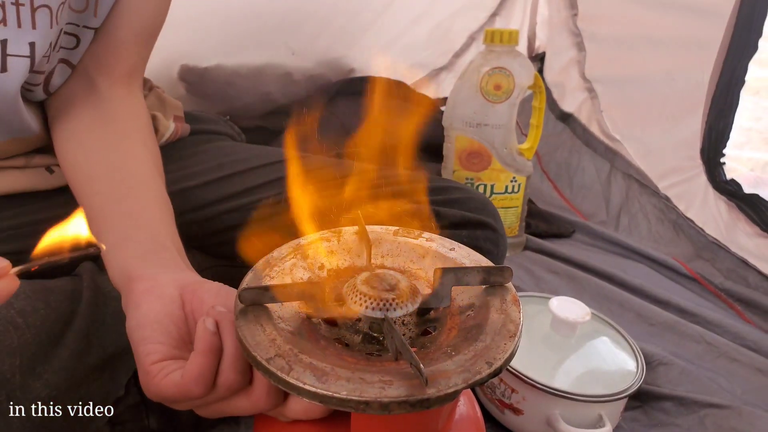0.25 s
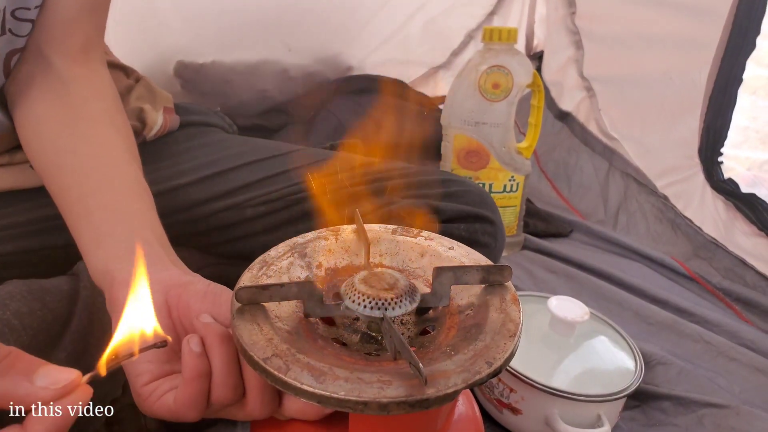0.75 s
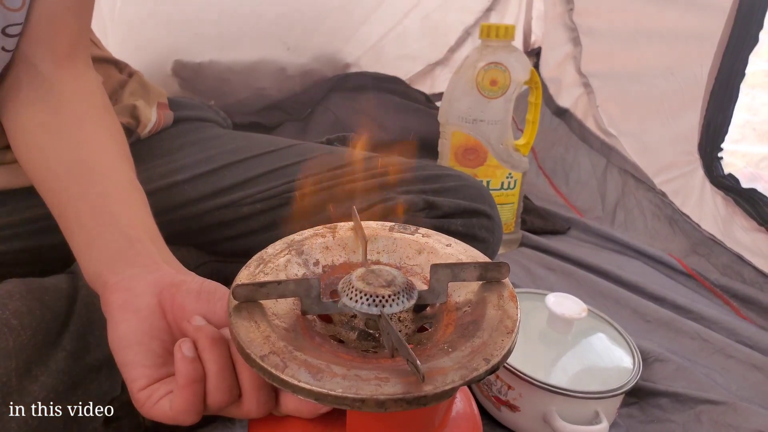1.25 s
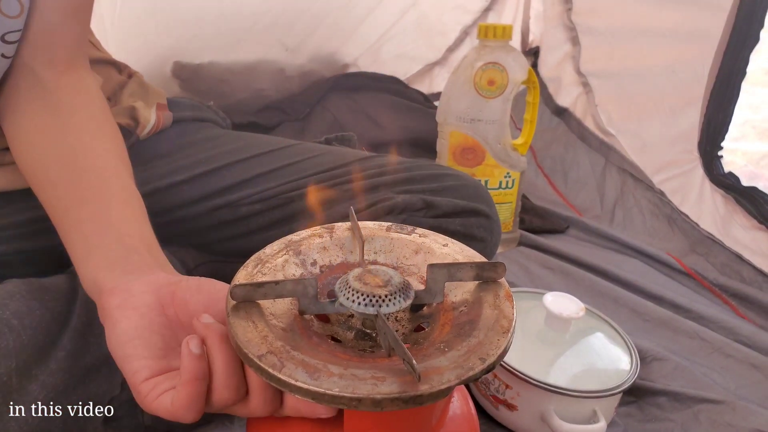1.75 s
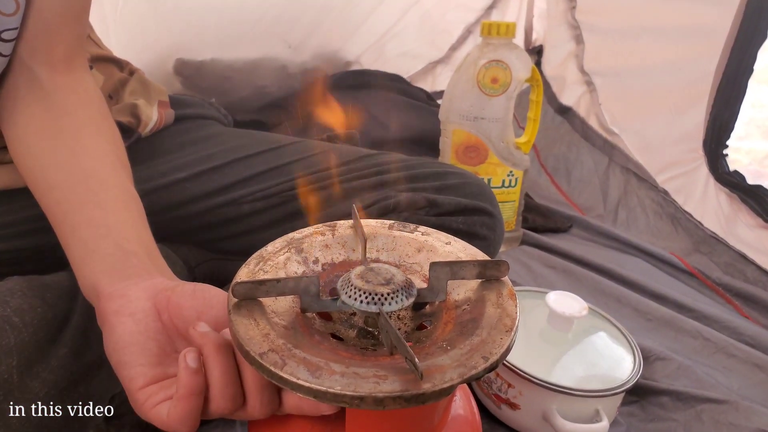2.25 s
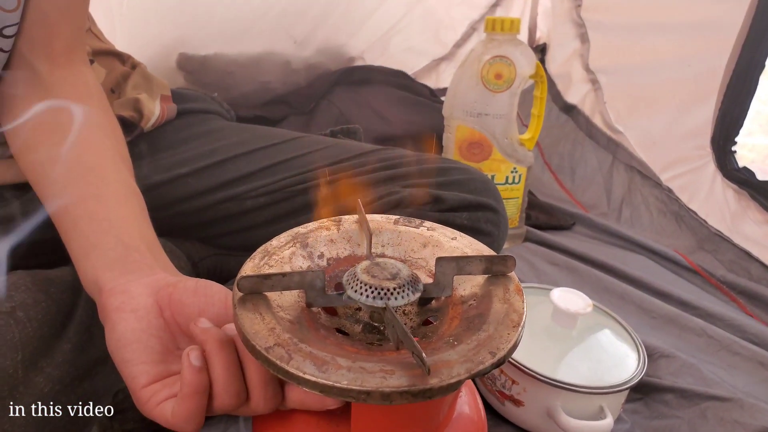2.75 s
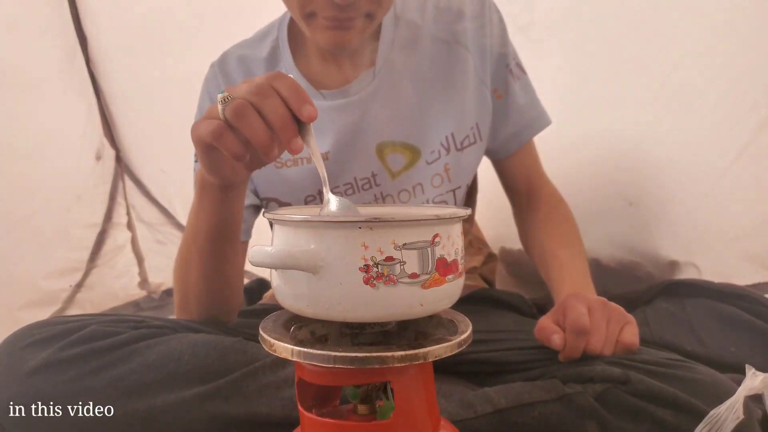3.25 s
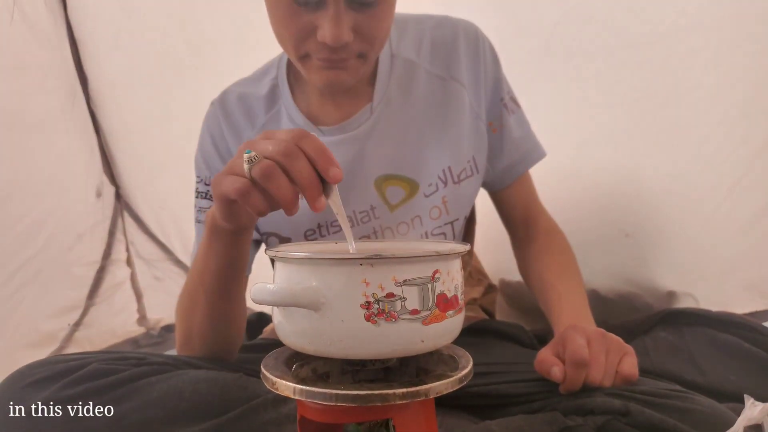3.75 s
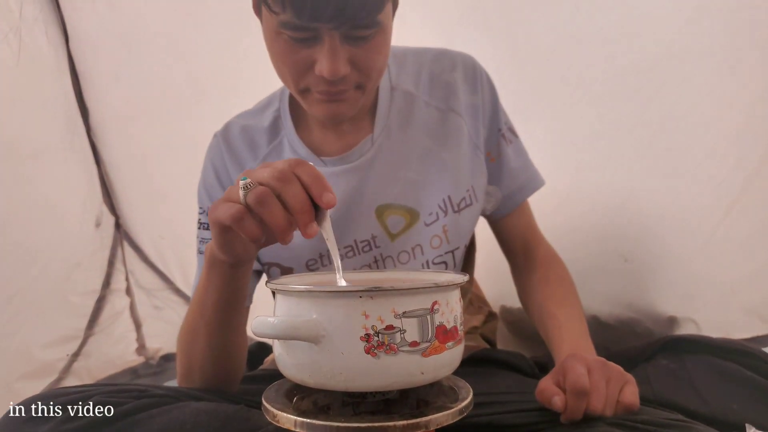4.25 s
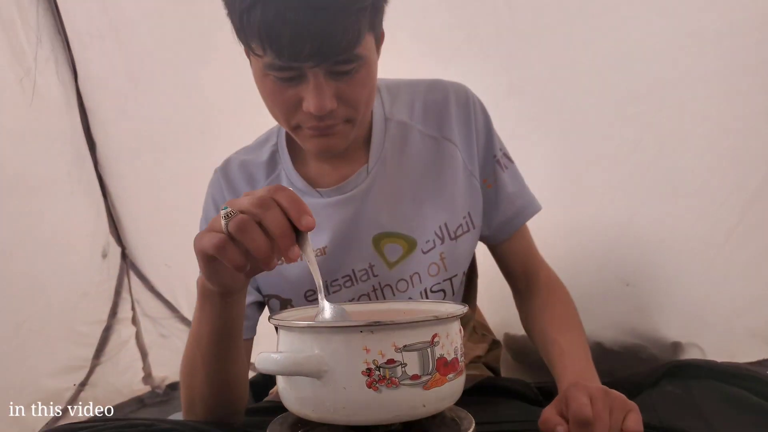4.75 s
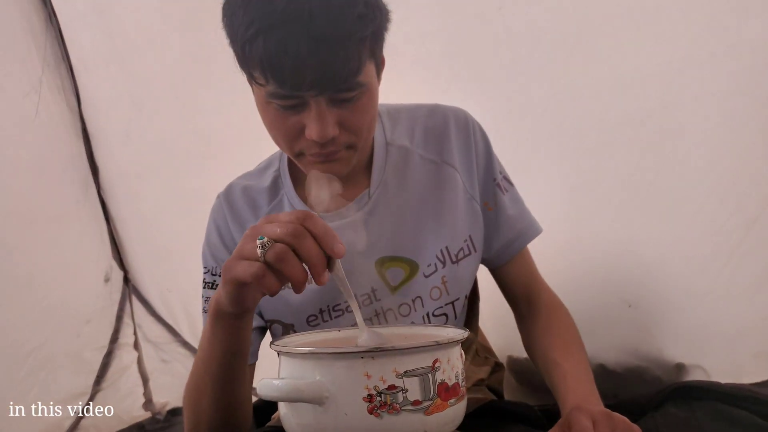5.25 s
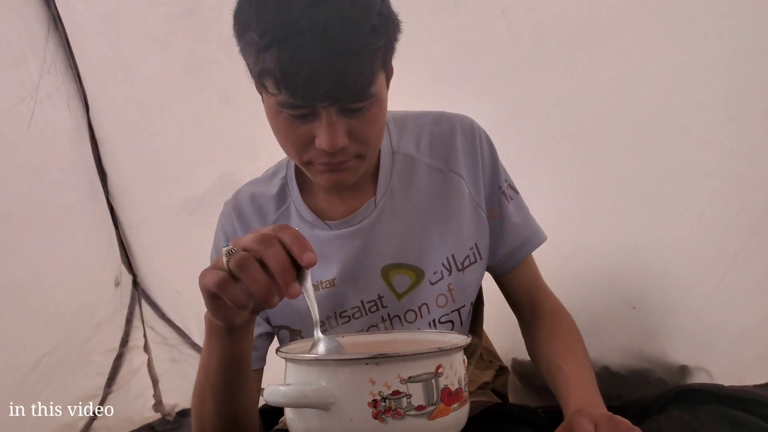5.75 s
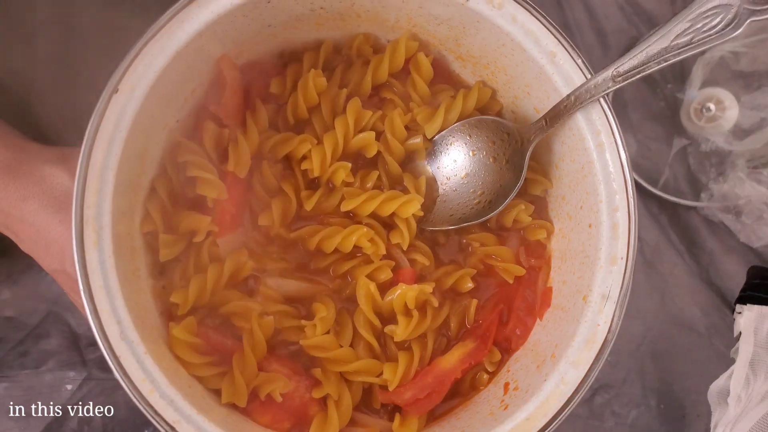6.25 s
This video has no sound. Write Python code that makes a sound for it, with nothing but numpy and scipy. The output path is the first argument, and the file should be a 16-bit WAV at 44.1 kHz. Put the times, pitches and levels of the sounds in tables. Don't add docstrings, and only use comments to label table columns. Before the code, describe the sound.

An open gas burner hisses, rings and flutters as its valve is turned, then a spoon stirs a sizzling pot, knocks the rim, and stew bubbles close up.

```python
import sys
import numpy as np
from scipy import signal
from scipy.io import wavfile
from scipy.ndimage import uniform_filter1d

SR = 44100
rng = np.random.default_rng(int(sys.argv[2]) if len(sys.argv) > 2 else 0)


def unload_audio(sound):
    columns = np.transpose(np.atleast_2d(sound))
    steps = np.round(np.clip(columns, -1, 1) * 32767)
    wavfile.write(sys.argv[1], SR, steps.astype(np.int16))


def attenuation_scalar(level_db):
    decades = np.asarray(level_db, float) / 20
    return 10 ** decades


N = 285768

# (time [s], gas jet level [dB])
VALVE_S_DB = [
    (0.0, -36.5),
    (0.18, -37),
    (0.93, -42.5),
    (1.4, -43),
    (1.63, -45),
    (1.96, -36.5),
    (2.43, -38),
    (2.75, -43.5),
    (2.98, -44),
]
# (level at middle setting [dB], slope [dB per dB of jet])
VALVE_RESPONSE = [
    (-50, 0.43),
    (-48, 0.37),
    (-48.5, 0.92),
]
# (frequency [Hz], left [dB], right [dB])
RUMBLE_COLOUR = [(15, -27, -28), (25, -19, -20), (40, -9.5, -10.5), (55, -1.5, -2.6), (78, 0.0, -0.6),
                 (100, -1.3, -1.7), (125, -4.9, -5.1), (160, -8.3, -8.2), (220, -11.5, -10.2),
                 (310, -15.8, -18.9)]
ROAR_COLOUR = [(316, -16, -36), (399, -4, -7.5), (520, -2, 2.5), (587, 4.5, -7), (788, -8, -6.5),
               (890, -3, -2), (963, -15.5, -10), (1140, -11, -7.5), (1324, -7, -3), (1420, -10, -10.5),
               (1670, -6, -4), (1950, -16, -8.5), (2150, -8, -3)]
JET_COLOUR = [(2190, -7, -40), (2230, -12.5, -9), (2600, -8.5, -4), (2680, -1, -7), (3160, -12, -3.5),
              (3440, -7, -7), (3810, -9.5, -2), (3830, -6, -0.5), (3940, -6, -2), (4830, -8, -2),
              (5250, -12.5, -5.5), (5720, -8, -5), (6370, -7.5, -2), (6430, -11, -4.5)]
FIZZ_COLOUR = [(6600, -30, 3.5), (7050, -6.5, -2), (8070, -1.5, -6.5), (9250, -16.5, -10),
               (10170, -4.5, -5), (11400, -10, -7), (12240, -7.5, -7), (13500, -14, -10),
               (14900, -4.5, -6.5), (15800, -13, -11.5)]
# (start [s], end [s], from [Hz], to [Hz], level against jet [dB])
HEAD_RINGS = [(0.0, 0.48, 3350, 3760, -8), (0.3, 0.47, 2880, 2840, -5.5), (0.1, 0.2, 2700, 3200, -8),
              (-0.5, 0.7, 6500, 6800, -17), (0.4, 0.97, 3000, 2760, -8.5), (-0.4, 0.71, 3060, 3070, -10),
              (0.2, 0.49, 4200, 3840, -8), (0.92, 1.44, 2630, 2950, -7), (1.5, 1.3, 3130, 3250, -6.5),
              (1.5, 1.6, 6150, 6150, -13), (1.5, 2.33, 3640, 4100, -12.5), (1.9, 2.43, 2640, 2520, -11),
              (1.4, 2.3, 2900, 3040, -12), (2.5, 2.7, 2560, 2130, -14), (2, 3.1, 2700, 3500, -24),
              (2.1, 3.0, 6300, 6100, -12.5)]
# (centre [s], peak [dB], frequency [Hz], half length [s])
FLUTTERS = [(0.031, -41, 106.3, 0.14), (0.137, -33, 79, 0.039), (0.263, -40, 87, 0.023),
            (0.314, -34, 86, 0.0038), (1.29, -41, 67, 0.02), (2.199, -46, 70.4, 0.045),
            (4.254, -53, 58.4, 0.018), (4.46, -60, 65, 0.021), (4.606, -44.5, 55, 0.017),
            (4.854, -61, 70, 0.035), (5.95, -60, 75, 0.027), (5.401, -50, 70, 0.01),
            (5.507, -54, 54.6, 0.015), (6.04, -58, 81, 0.03)]
# (time [s], level [dB])
STIR_S_DB = [
    (2.97, 1.5),
    (4.1, 1),
    (4.4, 1),
    (4.95, 3.5),
    (5.1, -1.5),
    (5.45, 2),
    (5.7, 1),
    (5.85, -0.5),
    (6.0, 3.5),
    (6.2, 0),
]
# (frequency [Hz], left [dB], right [dB])
POT_RUMBLE_COLOUR = [(15, -17, -18), (25, -11, -11), (40, -5, -4.7), (55, -1.2, 0.0), (72, -0.7, -0.1),
                     (95, -4.2, -4.8), (120, -10.0, -10.2), (150, -12.8, -12.7), (220, -15.5, -15.6),
                     (320, -17, -17), (420, -18, -17)]
POT_HUM_COLOUR = [(444, -26, -10), (535, -3, -2), (620, -38, -18), (710, -2, -12), (790, 3.5, 3.5),
                  (870, -9.5, -9), (1000, -7.5, -28), (1180, -18, -6), (1420, -5.5, -5), (1590, -6.5, -3),
                  (1697, 5, -3), (1920, -8, -2.5), (2160, -21, -4.5), (2330, 2, -16)]
SIZZLE_COLOUR = [(2400, -19, -7), (2440, -2, 2), (3000, -1, -1), (3320, 0.5, -2), (4200, -15, 2.5),
                 (4670, -0.5, -3.5), (5500, -7.5, 2.8), (6470, -3, -0.5), (7240, -10.5, -0.5),
                 (8400, -9, -10), (9160, -6, -2.5), (11600, -8.5, -2.5), (14000, -7, -5.5),
                 (16000, -4.5, -8)]
# (time [s], level [dB], hollowness [dB], T60 [s])
STROKES = [(3.3706, -43, -7.5, 0.067), (3.489, -43.5, -7, 0.24), (3.512, -46, -16, 0.14),
           (3.5394, -45, -8, 0.11), (3.564, -50, 5.5, 0.065), (3.581, -45, -11, 0.085),
           (3.939, -42.5, -8, 0.053), (4.0408, -43, -7, 0.083), (4.23, -46.5, -3, 0.1),
           (4.277, -50, 3, 0.062), (4.4574, -52, -6, 0.097), (4.4794, -43, -4, 0.075),
           (4.572, -44.5, -9, 0.38), (4.698, -43.5, -9, 0.079), (4.807, -35, -12, 0.043),
           (5.068, -45, -5, 0.081), (5.211, -44, -7.5, 0.094), (5.353, -42, -1.5, 0.12),
           (5.367, -44, -6, 0.15), (5.464, -49, -1.5, 0.19), (5.581, -38.5, -11, 0.043),
           (5.699, -42, -9, .07), (5.823, -42.5, -6, 0.064), (5.9919, -38, -10, .05),
           (6.118, -41.5, -11, 0.13), (6.1896, -38.5, -15, 0.14), (6.3714, -43, -6, 0.091),
           (6.422, -41, -10, .048)]
# (time [s], level [dB], brightness [dB])
SPITS = [(2.961, -41, -2), (3.4294, -62, 2), (3.6802, -42, -10), (3.745, -41, -17), (3.7635, -44, -4),
         (3.856, -44, -6), (4.3994, -60, 9), (4.526, -41.5, -12), (4.664, -41, -10), (5.1325, -47, -.1),
         (5.1604, -42, -7), (5.3344, -43, -15), (5.615, -43, -15), (5.7114, -41, -9)]
# (time [s], peak [dB])
TICKS = [(3.0313, -43), (3.374, -41), (3.4923, -46), (3.5382, -42), (3.5821, -42), (3.6609, -45),
         (3.6813, -39), (3.7527, -44), (3.7701, -40), (3.8943, -38), (3.9901, -37.5), (4.054, -40),
         (4.3977, -38), (4.4571, -46), (4.5249, -42), (4.5758, -40), (4.7319, -38), (4.8078, -46),
         (4.94, -23), (5.0318, -38), (5.1335, -41), (5.472, -34), (5.5007, -37), (5.6653, -38),
         (5.7002, -47), (5.824, -40), (5.9936, -46), (6.2106, -40), (6.2774, -42), (6.3413, -37)]
# (time [s], level [dB], frequency [Hz])
BUMPS = [(3.563, -48, 471), (3.622, -45.5, 121), (3.681, -45, 283), (3.83, -57, 186), (3.992, -53, 202),
         (4.174, -42, 258), (4.388, -60, 121), (4.438, -43, 458), (4.479, -45, 194), (4.587, -55, 121),
         (4.798, -77, 202), (5.252, -51, 121), (5.357, -46, 146), (5.388, -52, 121), (5.482, -50, 253),
         (5.605, -40.5, 342), (5.818, -56, 398), (5.931, -46, 121), (5.989, -52, 328), (4.29, -49, 300),
         (4.91, -56, 220), (4.7, -52, 250), (5.946, -50, 280), (0.05, -38, 140), (3.468, -50, 201),
         (4.4, -48, 250), (4.631, -52, 200), (5.265, -51, 210), (5.671, -49, 250), (6.05, -53, 260),
         (4.035, -56, 760), (6.474, -36, 400)]
# (time [s], peak [dB], frequency [Hz])
SNAPS = [(3.374, -50, 3000), (3.681, -39.5, 6000), (4.526, -41, 7000), (4.5306, -32.5, 1240),
         (6.1935, -30, 3200), (6.4465, -40, 2000), (6.272, -36, 700), (6.41, -36, 1150),
         (4.8085, -31, 3960), (5.58, -30.5, 2200), (5.992, -36, 2500), (6.3735, -36, 2190),
         (6.425, -31, 1100)]
# (time [s], level [dB], hardness [Hz])
RIM_BLOWS = [
    (4.9382, -19.5, 5000),
    (4.9420, -23, 18000),
]
# (frequency [Hz], level [dB], T60 [s])
RIM_MODES = [(586, -2, 0.034), (710, 3, 0.02), (930, -19, 0.041), (1700, -17, .07), (1990, -12, 0.083),
             (2430, -13, 0.11), (3340, -8.5, 0.07), (4160, -11.5, .07), (5550, -5, 0.066), (7140, -9, .05),
             (10400, -10, .05), (12022, -10, .05), (12560, 6, 0.047), (14515, -11, 0.054)]
# (frequency [Hz], left [dB], right [dB])
RIM_COLOUR = [(850, -6, -7), (1100, -16, -19), (1900, -3, 0.5), (2660, -17, -8), (3350, -8, -10.5),
              (5400, -24, -7.5), (6500, -35, -8), (9400, -4.5, -11), (12400, -22, -5), (15500, -6, -9.5)]
# (time [s], level [dB])
STEW_S_DB = [
    (6.15, -44),
    (6.196, -50.5),
    (6.238, -48),
    (6.43, -49.5),
    (6.464, -49.5),
    (6.48, -48),
]
# (frequency [Hz], left [dB], right [dB])
BUBBLING_COLOUR = [(30, -2, -6), (250, -10.5, -16.5), (454, -1, -6), (700, 0, 0), (1000, -1, -0.5),
                   (1770, -6, 1.5), (2280, -9, -2.5), (2900, 0, -0.5), (3250, -12, -11), (3600, -2, -1),
                   (4200, -10, -1.5), (6530, -11.0, -2.5), (8500, -12, -10), (11000, -7, -6),
                   (15600, -4, -6.5)]
# (frequency [Hz], correlation [0-1])
PORT_LIKENESS = [(60, .99), (400, .97), (900, .95), (1300, .8), (2000, .65), (4000, .55), (7000, .4),
                 (15000, .35)]


def burner():
    start_s, (rumble, roar, jet, fizz) = flame_levels()
    n = len(jet)
    flame = attenuation_scalar(-0.76) * rumble * hiss(RUMBLE_COLOUR, n, lag=60.0, patchy_db=1.5, flicker_db=0.5, size=2048)
    flame += attenuation_scalar(-0.5) * roar * hiss(ROAR_COLOUR, n, lag=12.2, patchy_db=0.44, flicker_db=1.0,
                                     streak_db=1.5, size=1024)
    head = hiss(JET_COLOUR, n, lag=14.1, patchy_db=1.93, flicker_db=0.2, streak_db=3.0, size=1024)
    gas = attenuation_scalar(-0.2) * jet * (head + rings(head))
    gas += attenuation_scalar(1.9) * fizz * hiss(FIZZ_COLOUR, n, lag=14.04, patchy_db=1.5, flicker_db=0.66,
                                  streak_db=3.0, size=1024)
    return start_s, flame + gas


def flame_levels():
    cut_s, cut_fade_s = 2.965, 0.13
    valve_mid_db = -39
    catch_rumble_db, catch_roar_db, catch_decay_s = 10, 3, 0.045
    lick_db, licks_per_s = 0.62, 20
    t, fade = shot(0, cut_s + 0.1)
    jet_db = np.interp(t, *np.transpose(VALVE_S_DB))
    fade = fade * attenuation_scalar(-20 * np.maximum(t - cut_s, 0) / cut_fade_s)
    rumble, roar, fizz = (fade * attenuation_scalar(db + slope * (jet_db - valve_mid_db)) for db, slope in VALVE_RESPONSE)
    catch = np.exp(-t / catch_decay_s)
    lick = lick_db * waver(len(t), licks_per_s)
    rumble = rumble * attenuation_scalar(catch_rumble_db * catch + lick)
    roar = roar * attenuation_scalar(catch_roar_db * catch + 1.3 * lick)
    return 0, (rumble, roar, fade * attenuation_scalar(jet_db), fizz)


def rings(head):
    width_hz, waver_db, wavers_per_s = 65, 2.5, 14
    out = np.zeros_like(head)
    level_db = waver_db * waver(head.shape[1], wavers_per_s)
    for start_s, end_s, from_hz, to_hz, db in HEAD_RINGS:
        part = head[:, max(round(start_s * SR), 0):round(end_s * SR)]
        u = np.linspace(0, 1, part.shape[1])
        ring = resonate(part, from_hz + (to_hz - from_hz) * u, width_hz)
        arch = np.sqrt(np.sin(np.pi * u) + 1e-9)
        add(out, max(start_s, 0), attenuation_scalar(db) * arch * evened(ring))
    return out * attenuation_scalar(level_db)


def resonate(x, hz, width_hz):
    turn = np.exp(2j * np.pi * np.cumsum(hz) / SR)
    r = np.exp(-np.pi * width_hz / SR)
    return 2 * (turn * signal.lfilter([1 - r], [1, -r], x / turn)).real


def flutter(s, db, hz, half_s):
    t = np.arange(max(-s, -3 * half_s), 3 * half_s, 1 / SR)
    throb = attenuation_scalar(db) * np.exp(-(t / half_s) ** 2) * np.sin(2 * np.pi * hz * t)
    return s + t[0], np.array([throb, throb])


def pot():
    start_s, (rumble, hum, sizzle) = pot_levels()
    n = len(hum)
    low = attenuation_scalar(0.5) * rumble * hiss(POT_RUMBLE_COLOUR, n, lag=14.0, patchy_db=2.0, flicker_db=3.0, size=2048)
    body = hum * hiss(POT_HUM_COLOUR, n, lag=7.9, patchy_db=1.0, flicker_db=1.0, size=1024)
    top = attenuation_scalar(-0.5) * sizzle * hiss(SIZZLE_COLOUR, n, lag=11.47, patchy_db=1.44, flicker_db=0.5, streak_db=2.0)
    return start_s, low + body + top


def pot_levels():
    start_s, end_s, sloshes_per_s = 2.97, 6.2, 10
    t, fade = shot(start_s, end_s)
    effort_db = np.interp(t, *np.transpose(STIR_S_DB))

    def level(db, db_per_effort_db, slosh_db):
        return fade * attenuation_scalar(db + db_per_effort_db * effort_db + slosh_db * waver(len(t), sloshes_per_s))

    return t[0], [level(-67, 2.5, 0.6), level(-60.5, 0.27, -0.4), level(-53.5, 0.58, 0.5)]


def strokes():
    rise_s, stroke_top_db = 0.002, -7.5
    spit_low_db, spit_t60_s, tick_t60_s = -18, 0.099, 0.043
    colours = POT_HUM_COLOUR, SIZZLE_COLOUR[:10], SIZZLE_COLOUR[9:]
    low, middle, top = (hiss(c, N, lag=11, patchy_db=2, flicker_db=1) for c in colours)
    bursts = [(s, db, hollow_db, stroke_top_db, t60_s) for s, db, hollow_db, t60_s in STROKES]
    bursts += [(s, db, spit_low_db, bright_db, spit_t60_s) for s, db, bright_db in SPITS]
    bursts += [(s, db - 19, -20, 9.0, tick_t60_s) for s, db in TICKS]
    gates, t = np.zeros((3, N)), np.arange(SR // 4) / SR
    for s, db, low_db, top_db, t60_s in bursts:
        shape = np.minimum(t / rise_s, 1) * attenuation_scalar(-60 * np.maximum(t - rise_s, 0) / t60_s)
        band_db = np.array([[low_db - 3.0], [-9.0], [top_db - 2.5]])
        add(gates, s, attenuation_scalar(db + band_db) * shape)
    return gates[0] * low + gates[1] * middle + gates[2] * top


def bump(s, db, hz):
    t = np.arange(2000) / SR
    push = np.sin(2 * np.pi * hz * t) * np.exp(-t * hz / 0.62) * np.minimum(t * hz * 3, 1)
    return s, attenuation_scalar(db + 2.5) * np.array([push, 0.69 * push])


def knock(s, db, hardness_hz):
    t = np.arange(SR // 6) / SR
    ring = np.zeros(len(t))
    for hz, mode_db, t60_s in RIM_MODES:
        softening = np.hypot(1, (hz / hardness_hz) ** 2)
        ring += attenuation_scalar(mode_db - 60 * t / t60_s) * np.sin(2 * np.pi * hz * t) / softening
    ring = ring / abs(ring).max() * attenuation_scalar(np.array([[-2.5], [1.5]]))
    ring[1] = np.roll(ring[1], 11)
    rattle = hiss(RIM_COLOUR, len(t), lag=11, patchy_db=1, flicker_db=1, size=256)
    rattle = signal.lfilter(*signal.butter(2, min(hardness_hz, 20000), fs=SR), rattle)
    rim_decay, tent_decay = attenuation_scalar(-8.0 - 60 * t / 0.091), attenuation_scalar(-29.0 - 60 * t / 0.33)
    rattle *= np.minimum(t / 0.00083, 1) * (rim_decay + tent_decay)
    above = signal.butter(10, 550, "high", fs=SR, output="sos")
    return s, attenuation_scalar(db) * signal.sosfilt(above, ring + rattle)


def stew():
    start_s, pops_per_s = STEW_S_DB[0][0], 60
    at, fade = shot(start_s, STEW_S_DB[-1][0])
    level = fade * attenuation_scalar(np.interp(at, *np.transpose(STEW_S_DB)))
    n, t = len(level), np.arange(400) / SR
    bubbles = np.zeros(n)
    for hz in np.geomspace(520, 2600, 14):
        sizes = attenuation_scalar(4 * np.minimum(rng.exponential(1, n), 4))
        pops = sizes * (rng.random(n) < pops_per_s / SR)
        pop = np.sin(2 * np.pi * hz * t * (1 + 25 * t)) * np.exp(-t * hz / 2.0) * np.minimum(t * hz, 1)
        bubbles += signal.oaconvolve(pops, pop)[:n]
    bubbles = np.array([bubbles, np.roll(bubbles, 12)])
    thin = hiss(BUBBLING_COLOUR, n, lag=7.6, patchy_db=1.0, flicker_db=1.9)
    return start_s, level * evened(thin + attenuation_scalar(-13.5) * evened(bubbles))


def hiss(colour, count, lag, patchy_db, flicker_db, streak_db=0, size=512):
    hz = np.fft.rfftfreq(size, 1 / SR)
    shape = (len(hz), 4 * count // size + 6)
    a, b, c, d = rng.standard_normal((4,) + shape)
    same = np.clip(read(*np.transpose(PORT_LIKENESS), hz), 0, 1)[:, None]
    left, other = a + 1j * b, c + 1j * d
    z = np.array([left, same * left + np.sqrt(1 - same ** 2) * other])
    field_db = patchy_db * drift(shape, 16, 6)
    field_db += flicker_db * drift((1, shape[1]), 5, 1)
    field_db += streak_db * drift(shape, 60, 1)
    z *= ports(colour, hz, lag)[..., None] * attenuation_scalar(field_db)
    return evened(signal.istft(z, nperseg=size, noverlap=3 * size // 4)[1][:, :count])


def ports(colour, hz, lag):
    f, left_db, right_db = np.transpose(colour)
    octaves = np.log2(hz + 1)
    top = np.log2(f[-1]) + (f[-1] > 15000)
    inside = np.minimum(octaves - np.log2(f[0]), top - octaves)
    ends = 1 / (1 + np.exp(-np.clip(24 * inside, -40, 40)))
    bend = 1 + (610.0 / (hz + 1)) ** 2
    late = np.exp(-2j * np.pi * hz * lag / SR / bend)
    return np.sqrt(ends) * np.array([attenuation_scalar(read(f, left_db, hz)), attenuation_scalar(read(f, right_db, hz)) * late])


def drift(shape, frames, bins):
    field = uniform_filter1d(rng.standard_normal(shape), bins, 0)
    return evened(uniform_filter1d(field, frames, 1).ravel()).reshape(shape)


def waver(count, per_s):
    t = np.arange(count // 64 + 2) * 64 / SR
    rates = np.geomspace(per_s / 8, per_s, 24)
    slow = sum(np.sin(2 * np.pi * (f * t + rng.random())) / np.sqrt(f) for f in rates)
    return np.interp(np.arange(count) / SR, t, evened(slow))


def shot(start_s, end_s):
    t = np.arange(start_s, end_s, 1 / SR)
    rise = (t - start_s) / 0.03 + (start_s <= 0)
    fall = (end_s - t) / 0.03 + (end_s > N / SR - 0.02)
    return t, np.clip(np.minimum(rise, fall), 0, 1)


def evened(x):
    return x / np.sqrt(np.mean(np.atleast_2d(x).mean(0) ** 2) + 1e-20)


def read(f, value, hz):
    return np.interp(np.log(hz + 1), np.log(np.asarray(f) + 1), value)


def add(mix, s, sound):
    part = mix[:, round(s * SR):][:, :sound.shape[1]]
    part += sound[:, :part.shape[1]]


def scene():
    mix = strokes()
    events = [flutter(*f) for f in FLUTTERS]
    events += [bump(*b) for b in BUMPS + SNAPS]
    events += [knock(*b) for b in RIM_BLOWS]
    for sound in [burner(), pot(), stew(), *events]:
        add(mix, *sound)
    return mix


def thinned(x):
    hole_db, mask_db, hole_from_hz = -10.5, -12.3, 2050
    ragged_hz, ragged_share = 15280, 0.2
    hz, t, z = signal.stft(x, SR, nperseg=1024)
    power, upper = (abs(z) ** 2).mean(0), hz[:, None] > hole_from_hz
    near, wide = uniform_filter1d(power, size=3, axis=0), uniform_filter1d(power, size=101, axis=0)
    patch = uniform_filter1d(uniform_filter1d(power, size=5, axis=0), size=2, axis=1)
    whole = uniform_filter1d((power * upper).mean(0), size=8)
    loud_enough = (near > wide * attenuation_scalar(hole_db) ** 2) & (patch > whole * attenuation_scalar(mask_db) ** 2)
    ragged = np.repeat(rng.random(len(t)) < ragged_share, 3)[:len(t)]
    kept = (loud_enough | ~upper) & ~(ragged & (hz[:, None] > ragged_hz))
    return signal.istft(z * kept, SR, nperseg=1024)[1][:, :N]


def roll_off(x):
    return signal.sosfilt(signal.butter(12, 16650, fs=SR, output="sos"), x)


def record(dry):
    edge_hz, bass_cut_hz = 15520, 36
    steep = signal.firwin(511, edge_hz, window=("kaiser", 9), fs=SR)
    limited = signal.oaconvolve(dry, steep[None], "same")
    limited = signal.lfilter(*signal.butter(2, bass_cut_hz, "high", fs=SR), limited)
    return roll_off(thinned(limited))


dry = scene()
out = record(dry)
unload_audio(out)
```